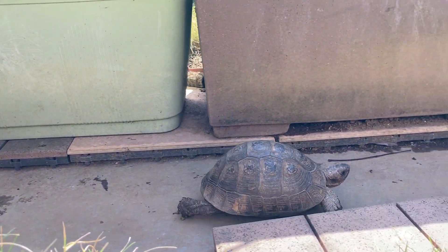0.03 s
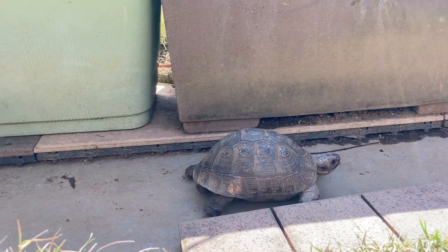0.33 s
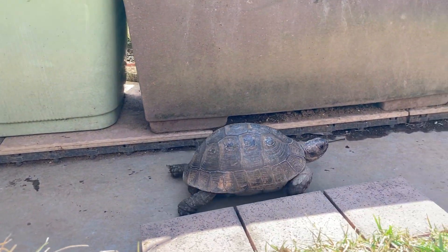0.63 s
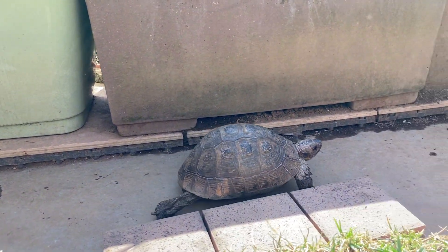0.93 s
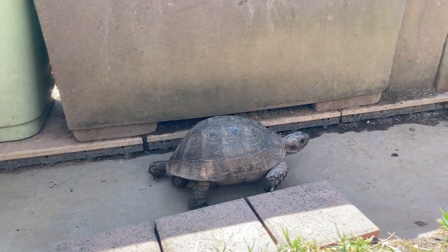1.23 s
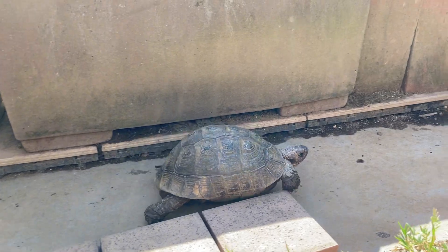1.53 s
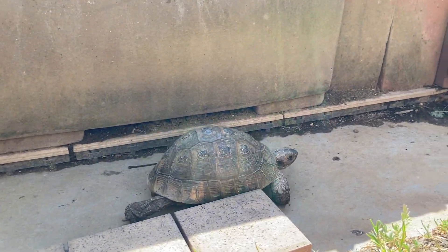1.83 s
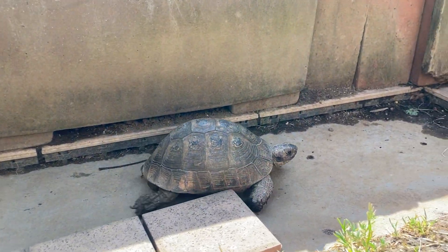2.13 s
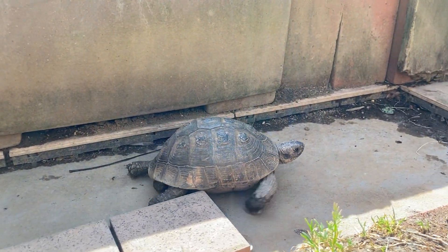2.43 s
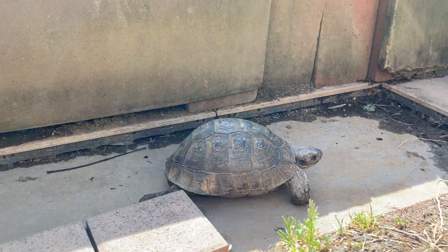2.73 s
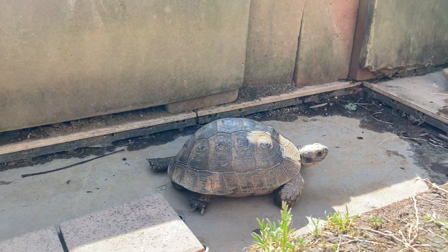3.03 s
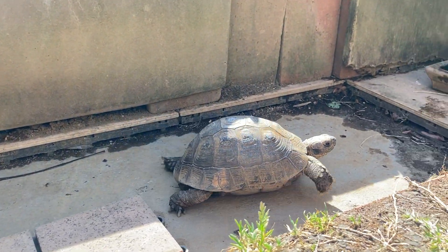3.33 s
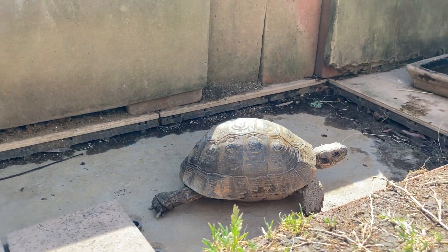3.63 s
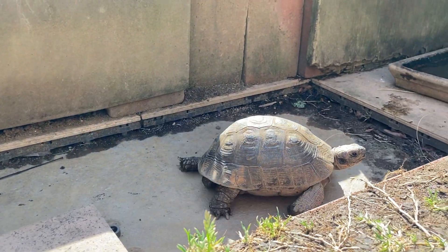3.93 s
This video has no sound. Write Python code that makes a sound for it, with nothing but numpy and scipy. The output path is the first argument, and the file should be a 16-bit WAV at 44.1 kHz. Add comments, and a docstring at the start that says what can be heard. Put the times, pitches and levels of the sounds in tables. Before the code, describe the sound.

Faint dry scraping of a tortoise walking, light clinks, then wind buffeting the microphone.

```python
"""A concrete yard, a tortoise plodding close by, followed on a hand-held camera's stereo microphone.
From the start, dry scrapes and rustles swell and stop over a low rumble and soft outdoor air.
From 0.7 s, small metal parts near the microphone (probably on a strap) squeal and clink.
The camera is bumped now and then, hardest at 1.8 s. After 3 s a gust rises, and buffets of air
hit the microphone and overload it."""
import sys
import numpy as np
from scipy import signal
from scipy.fft import rfft, irfft
from scipy.io import wavfile
from scipy.ndimage import uniform_filter1d

SR = 44100
rng = np.random.default_rng(int(sys.argv[2]) if len(sys.argv) > 2 else 0)


def bounce(signal):
    """Save signal as a 16-bit WAV file at the path given by the first command-line argument."""
    frames = np.transpose(np.atleast_2d(signal))
    limited = np.clip(frames, -1, 1)
    pcm = np.round(limited * 32767).astype(np.int16)
    wavfile.write(sys.argv[1], SR, pcm)


N = 176400

# close scrapes and rustles (peak t/s, rise/s, fall/s, level/dB) and their spectrum (f/Hz, level/dB)
SCRAPES = [(.075, 0.034, 0.05, -54), (.262, 0.037, 0.06, -46.5), (0.419, 0.13, 0.066, -47.5),
           (.71, 0.12, 0.15, -56.5), (.81, 0.15, 0.17, -50), (1.05, 0.08, 0.083, -60),
           (1.174, 0.095, 0.065, -49), (1.45, 0.14, 0.23, -58.5), (1.577, 0.19, 0.024, -49.5),
           (1.636, 0.047, 0.085, -48), (1.741, 0.084, 0.082, -45), (1.99, 0.13, 0.12, -62.5),
           (2.264, 0.14, 0.059, -45), (2.5, 0.09, 0.035, -59), (2.599, 0.065, 0.023, -56),
           (2.69, 0.06, 0.065, -53), (2.9, 0.16, 0.16, -51.5), (3.051, 0.15, 0.19, -48),
           (3.535, 0.62, 0.094, -52), (3.66, 0.24, 0.058, -58.5), (3.756, 0.13, 0.15, -52.5)]
SCRAPE_COLOUR = [(300, 13), (900, -2.5), (1600, 0), (3000, -2.5), (5500, -5), (8000, -1), (10500, -0.5),
                 (13000, -1.5), (16000, -11)]
# dry ticks (t/s, level/dB)
TICKS = [(.073, -55), (.555, -61), (0.8624, -34.5), (0.873, -39), (.9966, -58), (1.012, -49.5),
         (1.175, -45), (1.19, -52), (1.253, -53.5), (1.6137, -47), (2.255, -48), (2.271, -41.5),
         (2.291, -46.5), (2.66, -47.5), (2.669, -40), (2.708, -47.5), (2.972, -60), (3.3176, -49),
         (3.8672, -50.5), (3.8783, -47), (3.939, -47.5)]
# modes of the two metal parts (f/Hz, level/dB, t60/s)
SMALL_PART_MODES = [(4134, 0, .06), (4265, -11, .04), (6681, -6, .04), (6830, -13, .03), (11070, -14, .03)]
LARGE_PART_MODES = [(2730, -2, .06), (4472, 0, .05), (4600, -13, .03), (6630, -8, .04), (11200, -17, .04)]
# clinks (t/s, small part level/dB, large part level/dB)
CLINKS = [(0.8409, -37.5, -56), (0.862, -36, -64), (0.867, -33, -52), (0.909, -48.5, -58),
          (1.5615, -47, -56), (1.718, -43.5, -46), (1.755, -38, -36.5), (2.711, -65, -51)]
# modes of the sliding metal (f/Hz) and its slides (t/s, length/s, pitch ratio, level/dB of each mode)
SLIDE_MODES = [2735, 4110, 4470, 6640]
SLIDES = [(.676, .016, 1.04, -85, -57, -80, -78), (.712, .024, 1.04, -85, -59, -70, -72),
          (.738, .032, 1.036, -85, -72, -66, -61), (1.393, .028, 1.003, -78, -52, -80, -71),
          (1.424, .08, .997, -78, -59, -80, -70), (1.512, .036, 1, -67, -65, -69, -61),
          (1.548, .048, 1, -58, -66, -66, -58), (1.718, .056, 1.003, -53, -72, -61, -61),
          (2.408, .038, 1, -76, -90, -66, -72), (2.447, .054, 1, -70, -90, -65, -82),
          (2.672, .032, 1.008, -65, -85, -67, -74), (2.71, .026, 1.014, -62, -85, -61, -68)]
# handling bumps (t/s, hold/s, level/dB, low-pass f/Hz) and camera body resonances (f/Hz, level/dB)
BUMPS = [(0.029, .003, -47.5, 2030), (0.139, 0.0033, -46.5, 500), (0.18, 0.013, -38, 149),
         (.845, 0.065, -42, 297), (1.233, 0.0025, -45.5, 905), (1.7554, 0.011, -22, 1620),
         (1.775, 0.022, -26.5, 410), (2.406, 0.0037, -41.5, 1070), (2.674, 0.033, -33.5, 570),
         (2.722, 0.014, -34.5, 590)]
CAMERA_BODY = [(50, -14), (130, 3), (200, 3), (270, 1), (340, -7), (420, 4), (490, -3), (570, 0),
               (800, -15), (1150, -12), (2500, -17), (6000, -4)]
# buffets on the microphone (t/s, hold/s, level/dB, low-pass f/Hz, treble left minus right/dB)
BUFFETS = [(3.323, 0.015, -12.5, 520, -4.5), (3.364, 0.019, -15.5, 430, 1), (3.402, 0.0051, -12, 775, 0.5),
           (3.44, 0.0094, -9, 700, 0), (3.45, .013, -6, 740, 2.5), (3.515, 0.0034, -12.5, 400, -6),
           (3.549, 0.0073, -5.5, 2100, 18.5), (3.565, 0.0088, -7.5, 1700, 4.5),
           (3.64, 0.0057, -16.5, 1780, 6), (3.656, 0.0062, -17.5, 2000, 5.5),
           (3.67, 0.0089, -21, 1000, -2.5), (3.728, 0.0055, -21, 700, 3), (3.758, 0.014, -28, 1200, 12),
           (3.855, 0.014, -24, 1340, 11), (3.91, 0.014, -19, 400, 3), (3.975, 0.0092, -21, 570, 10)]
# spectrum of a buffet (f/Hz, level/dB)
BUFFET_COLOUR = [(25, -19), (70, 1), (140, 4.5), (215, 8.5), (310, 0.5), (420, 0), (560, -7), (720, -10.5),
                 (1400, -18.5), (3000, -31), (6000, -34.5)]
# wind on the microphone: strength (t/s, level/dB) and spectrum (f/Hz, level/dB)
WIND_LEVEL = [(3.08, -54), (3.19, -35.5), (3.3, -27), (3.34, -20.5), (3.46, -14), (3.53, -16.5),
              (3.572, -8), (3.605, -17.5), (3.67, -16.5), (3.8, -15.5), (3.88, -22), (3.93, -21), (4, -19)]
WIND_COLOUR = [(15, -40.5), (35, -7.5), (55, 3), (115, 1), (170, -11), (280, -13.5), (450, -22.5),
               (800, -34.5), (1400, -55), (3000, -69), (8000, -88)]
# low rumble: strength (t/s, level/dB) and spectrum (f/Hz, level/dB)
RUMBLE_LEVEL = [(0, -44), (.15, -40), (.4, -42), (1, -42), (1.6, -42), (1.8, -42), (2.05, -47), (2.2, -46),
                (2.36, -41), (2.6, -41), (2.78, -35), (2.93, -32), (3.08, -41), (3.2, -36)]
RUMBLE_COLOUR = [(15, -34), (35, -17), (52, -4), (68, 0), (80, -3), (105, -13), (160, -22), (300, -40),
                 (2000, -100)]
# outdoor air: strength (t/s, level/dB) and spectrum (f/Hz, level/dB)
AIR_LEVEL = [(0, -46), (.2, -49.5), (.5, -49.5), (1.1, -49), (2.1, -48.5), (2.8, -47.5), (4, -46.5)]
AIR_COLOUR = [(20, -5), (100, 1.5), (200, -3), (320, -6.5), (600, -19), (1000, -18.5), (1600, -28.5),
              (3000, -38), (6000, -44.5), (11000, -64), (16000, -61)]
# distant hiss: strength (t/s, level/dB) and spectrum (f/Hz, level/dB)
HISS_LEVEL = [(0, -70.5), (.55, -76.5), (1.22, -73), (1.3, -102), (2.1, -91), (2.6, -83.5), (4, -73.5)]
HISS_COLOUR = [(500, -23.5), (1600, -22), (3800, 22.5), (6000, -15.5), (10000, -18.5), (16000, -31)]
# left-right shift that the recorder's stereo processing gives close sounds (f/Hz, phase/rad)
STEREO_PHASE = [(100, 0), (950, .9), (1650, 3.1), (2400, 5.8), (3300, 8.2), (4300, 11), (5500, 14.6),
                (6700, 12.8), (9100, 9.42), (11200, 6.28), (13600, 3.14), (15400, .1)]

SLIPS_PER_S, SLIP_SPREAD_DB = 5000, 2.8
SCRAPE_RANGE_DB = 25.5  # change over one rise or fall time
CLINK_CONTACT_S, CLINK_DETUNE = 0.00063, 0.0027
SQUEAL_WAVER, SQUEAL_RASP, SQUEAL_STUTTER_DB = .003, .35, 3
WIND_BRIGHT_HZ, WIND_FULL_DB = 323, -15.5  # the band above this pitch fills in up to this gust level
ECHO_S, ECHO_DB = .00935, -20
TOP_HZ = 15900


def scrapes():
    """Close on the concrete, each stroke swells and dies as a stream of tiny, uneven slips."""
    t = clock()
    power = np.zeros(N)
    for at, rise, fall, db in SCRAPES:
        from_peak = np.maximum((at - t) / rise, (t - at) / fall)
        power += undb(db - SCRAPE_RANGE_DB * from_peak ** 1.03) ** 2
    noise = stereo_noise(correlation=.94)
    slip_size = np.minimum(rng.exponential(size=N), 6)
    slips = (rng.random(N) < SLIPS_PER_S / SR) * undb(SLIP_SPREAD_DB * slip_size)
    flutter = undb(wander(per_s=120))
    return colour(noise * slips, SCRAPE_COLOUR) * np.sqrt(power) * flutter


def ticks():
    """Snags give single dry ticks with the colour of the scrapes."""
    snags = sum(undb(db) * envelope(at, attack=.0004, hold=.0015, decay=.003) for at, db in TICKS)
    return snags * colour(stereo_noise(correlation=.94), SCRAPE_COLOUR)


def clinks(modes, part):
    """A struck metal part (0 small, 1 large) rings in its modes, slightly detuned at each contact."""
    age, out = clock()[:N // 16], np.zeros(N)
    modes_rms = np.sqrt(sum(undb(db) ** 2 for _, db, _ in modes) / 2)
    onset = 1 - np.exp(-age / CLINK_CONTACT_S)
    for hz, db, t60 in modes:
        fade = onset * undb(-60 * age / t60)
        for at, *levels in CLINKS:
            detune, phase = rng.standard_normal(2)
            pitch = hz * (1 + CLINK_DETUNE * detune)
            ring = np.sin(2 * np.pi * (pitch * age + phase)) * fade
            first = int(at * SR)
            out[first:first + len(age)] += undb(levels[part] + db) / modes_rms * ring
    return out


def squeals():
    """Sliding keeps the metal's modes rasping; each new grip favours other modes and shifts the pitch."""
    slides = np.array(SLIDES)
    grips = np.array([envelope(at, attack=.0044, hold=span, decay=.0042) for at, span in slides[:, :2]])
    ratio = slides[np.argmax(grips, axis=0), 2]
    out = np.zeros(N)
    for hz, levels in zip(SLIDE_MODES, slides[:, 3:].T):
        pitch = hz * ratio * (1 + SQUEAL_WAVER * wander(per_s=120))
        rasp = 1 + SQUEAL_RASP * (wander(per_s=900) + 1j * wander(per_s=900))
        tone = np.imag(rasp * np.exp(2j * np.pi * np.cumsum(pitch) / SR))
        stutter = undb(SQUEAL_STUTTER_DB * wander(per_s=130))
        out += unit(tone * stutter) * (undb(levels) @ grips)
    return out


def bumps():
    """Handling noise: the camera body knocks and shudders dully when the grip shifts."""
    return sum(undb(db) * thud(at, hold, CAMERA_BODY, hz, decay=.0075, jolt=.56, correlation=.96)
               for at, hold, db, hz in BUMPS)


def buffets():
    """Single eddies thump on the microphone ports, most of them brighter on the left."""
    return sum(
        undb(db) * thud(at, hold, BUFFET_COLOUR, hz, decay=.0062, jolt=.45, correlation=.58, pan_db=side)
        for at, hold, db, hz, side in BUFFETS)


def wind():
    """A gust roars on the microphone ports, brighter as it grows."""
    flow = steady(colour(stereo_noise(correlation=.75), WIND_COLOUR), samples=2600)
    low = irfft(rfft(flow) * low_pass(WIND_BRIGHT_HZ), N)
    gust = curve(WIND_LEVEL)
    brightness = np.minimum(gust / undb(WIND_FULL_DB), 1)
    return gust * (low + (flow - low) * brightness)


def rumble():
    """A narrow low rumble lies under everything, a little to the right."""
    noise = steady(colour(stereo_noise(correlation=.96), RUMBLE_COLOUR), samples=8000)
    return noise * curve(RUMBLE_LEVEL) * pan(-2)


def outdoor_air():
    """The yard's ambience: soft, wide noise whose level drifts."""
    drift = undb(wander(per_s=8.2))
    return colour(stereo_noise(correlation=.39), AIR_COLOUR) * curve(AIR_LEVEL) * drift


def distant_hiss():
    """Far off, a faint hiss centred near 3.8 kHz drops away and returns."""
    return colour(stereo_noise(correlation=.39), HISS_COLOUR) * curve(HISS_LEVEL)


def close_pickup(x):
    """Close sounds come back once from a hard surface nearby; the recorder's stereo processing
    shifts them between left and right, differently at each pitch."""
    f = freqs()
    shift = np.interp(f, *np.array(STEREO_PHASE).T)
    echo = undb(ECHO_DB) * np.exp(-2j * np.pi * f * ECHO_S)
    left, right = rfft(x) * (1 + echo)
    return irfft(np.array([left * np.exp(1j * shift) * undb(.5), right]), N)


def thud(at, hold, resonances, cutoff_hz, decay, jolt, correlation, pan_db=0):
    """A short shudder, led by a jolt sized relative to it, rings a resonant body."""
    size = 2 * (N // 32)
    f = freqs(size)
    shudder = np.exp(-np.maximum(np.arange(size) / SR - hold, 0) / decay)
    strength = np.linalg.norm(shudder)
    push = stereo_noise(correlation, size) * shudder
    push[:, 0] += jolt * strength
    # minimum phase, so the body rings only after the push
    cepstrum = irfft(np.log(response(resonances, size) * (low_pass(cutoff_hz, size) + 1e-4)))
    body = np.exp(rfft(2 * cepstrum[:size // 2], size) - cepstrum[0])
    ports = pan(pan_db / (1 + (680 / f) ** 2))  # the sides differ mainly above 680 Hz
    ring = unit(irfft(rfft(push) * body * ports)) * strength / np.sqrt(size)
    fade = np.minimum(np.linspace(2, 0, size), 1) ** 2
    return np.pad(ring * fade, ((0, 0), (int(at * SR), N)))[:, :N]


def undb(db):
    """Decibels to gain."""
    return 10 ** (np.asarray(db) / 20)


def pan(db):
    """Channel gains for a left-minus-right level in dB."""
    return undb(np.array([[.5], [-.5]]) * db)


def unit(x):
    """Scale to an rms of 1."""
    return x / np.sqrt(np.mean(x ** 2) + 1e-30)


def steady(x, samples):
    """Divide a stereo signal by its running rms."""
    return x / np.sqrt(uniform_filter1d(np.mean(x ** 2, axis=0), size=samples))


def clock():
    """Time of every sample in seconds."""
    return np.arange(N) / SR


def freqs(size=N):
    """Frequency of every spectral bin, at least 1 Hz."""
    return np.maximum(np.arange(size // 2 + 1) * SR / size, 1)


def curve(points):
    """Gain per sample along (t/s, level/dB) points."""
    return undb(np.interp(clock(), *np.array(points).T))


def response(points, size=N):
    """Gain per bin along (f/Hz, level/dB) points."""
    hz, db = np.array(points).T
    return undb(np.interp(np.log(freqs(size)), np.log(hz), db))


def colour(x, points):
    """Filter by (f/Hz, level/dB) points; rms 1."""
    return unit(irfft(rfft(x) * response(points), N))


def low_pass(hz, size=N, order=4.12):
    """Gain per bin of a steep treble cut."""
    return 1 / np.sqrt(1 + (freqs(size) / hz) ** (2 * order))


def stereo_noise(correlation, size=N):
    """Left and right white noise from mid and side; rms 1."""
    mid, side = rng.standard_normal((2, size))
    return unit(np.sqrt(1 + correlation) * mid + np.sqrt(1 - correlation) * np.array([side, -side]))


def wander(per_s):
    """Smooth random drift; rms 1."""
    step = int(SR / per_s)
    stairs = np.repeat(rng.standard_normal(N // step + 1), step)
    return unit(uniform_filter1d(stairs, step)[:N])


def envelope(start, attack, hold, decay):
    """Straight attack, hold, exponential decay; times in seconds."""
    age = clock() - start
    return np.clip(age / attack + .5, 0, 1) * np.exp(-np.clip((age - hold) / decay, 0, 40))


def scene():
    """The yard from the camera's position: close sounds, handling, background and wind."""
    close = scrapes() + ticks()
    close += clinks(SMALL_PART_MODES, part=0) + clinks(LARGE_PART_MODES, part=1) + squeals()
    bed = distant_hiss() + bumps() + rumble() + outdoor_air()
    bed[0] *= undb(1.05)  # left channel slightly up
    return close_pickup(close) + bed + wind() + buffets()


def record(dry):
    """The recorder rounds off overloads and cuts the top."""
    limited = dry / (1 + (np.abs(dry) / .95) ** 6) ** (1 / 6)
    return signal.sosfilt(signal.ellip(10, .2, 70, TOP_HZ, fs=SR, output="sos"), limited)


dry = scene()
out = record(dry)
bounce(out)
```